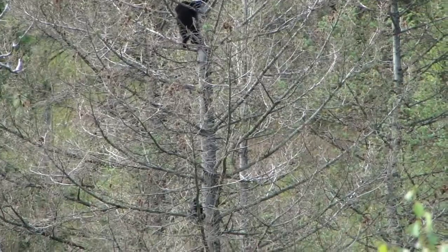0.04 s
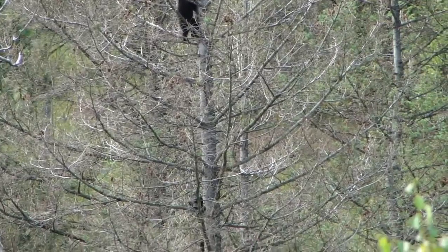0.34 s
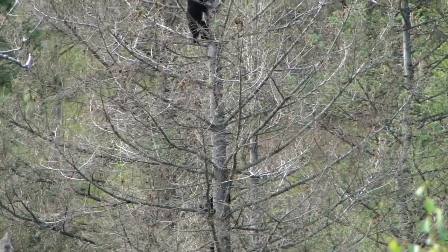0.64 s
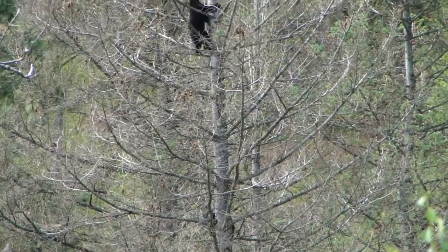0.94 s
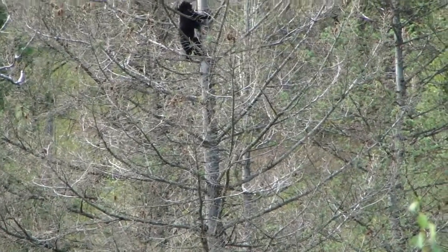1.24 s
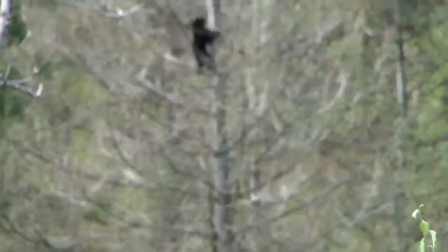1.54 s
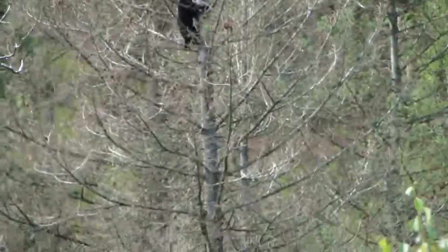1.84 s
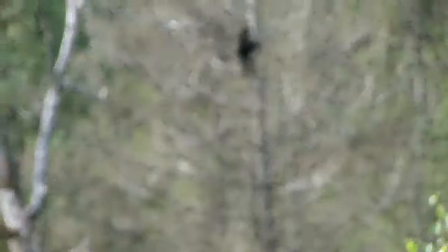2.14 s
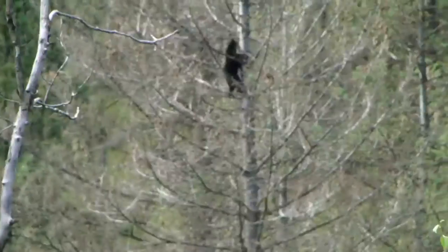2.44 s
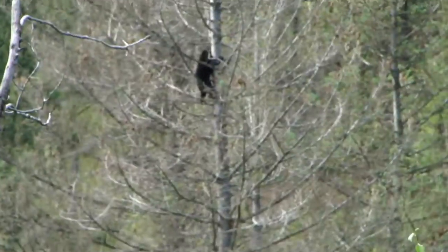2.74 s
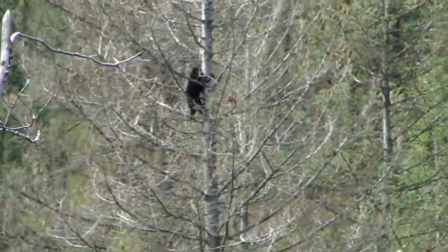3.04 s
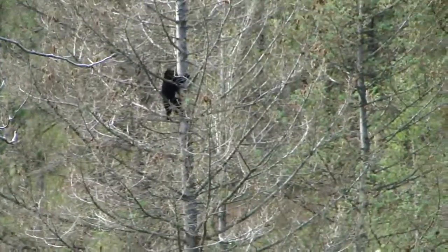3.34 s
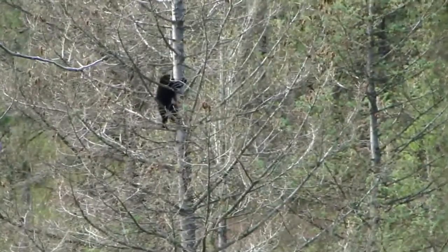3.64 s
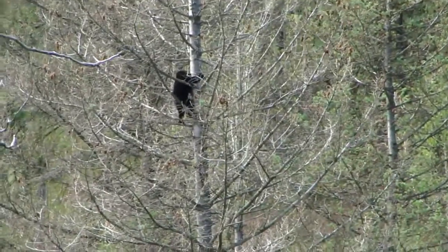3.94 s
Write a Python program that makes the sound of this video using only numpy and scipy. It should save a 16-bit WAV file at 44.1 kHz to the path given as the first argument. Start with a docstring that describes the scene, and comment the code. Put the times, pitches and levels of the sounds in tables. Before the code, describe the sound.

A distant roar, like tyres on a road, is loudest at first, swells slightly near 2 seconds and fades, with faint far knocks and a steady hiss of air and trees. From 1 to 2.5 seconds a camera's zoom lever clicks close by and its motor whirs in short runs, while fingers rub, bump and tick on the body. From about 3.5 seconds the focus motor hisses softly.

```python
"""Camera noises on a wooded hillside

A distant roar, most likely tyres on a road, swells once and fades, with faint knocks in it.
The air and the trees hiss steadily. Close by, the zoom lever of a hand-held camera clicks and
the gears of the lens motor whir in short runs; later the focus drive hisses.
Fingers rub, bump, tick and scrape on the camera body. Two microphones hear it, left and right."""
import sys
import numpy as np
from scipy import signal
from scipy.fft import rfft, irfft
from scipy.io import wavfile

SR = 44100
rng = np.random.default_rng(int(sys.argv[2]) if len(sys.argv) > 2 else 0)


def generate_wav(signal):
    """Clip the signal to [-1, 1] and save it as 16-bit WAV at the path in sys.argv[1]."""
    frames = np.transpose(np.atleast_2d(signal))
    scaled = np.clip(frames, -1, 1) * 32767
    pcm = np.round(scaled).astype(np.int16)
    wavfile.write(sys.argv[1], SR, pcm)


N = 176400
T = np.arange(N) / SR
HZ = np.maximum(np.arange(N // 2 + 1) * SR / N, 1)

# How the roar's low, middle and high parts rise and fall (time [s], relative level [dB])
ROAR_LOW_LEVEL = [(0, -27.5), (.4, -28), (.55, -30), (1.0, -32.5), (1.45, -34), (2.3, -38), (2.6, -37),
                  (3.3, -43.5), (4, -44.5)]
ROAR_MID_LEVEL = [(0.04, -25), (0.38, -24), (0.48, -29), (0.53, -26), (0.74, -30.5), (0.78, -26.5),
                  (1.4, -30.5), (1.6, -30), (1.91, -28), (2.55, -32), (3.0, -33.5), (3.2, -36.5),
                  (3.97, -38.5)]
ROAR_HIGH_LEVEL = [(0.04, -21), (.38, -24), (.5, -25), (1.0, -25.5), (1.39, -28), (1.51, -24.5),
                   (1.62, -25), (1.66, -21), (1.7, -29), (1.77, -25.5), (2.02, -21), (2.27, -25.5),
                   (2.31, -23.5), (2.42, -27), (2.55, -29.5), (3.0, -29), (3.15, -33.5), (3.48, -35),
                   (3.97, -33.5)]
# Brief surges of the middle and high parts (time [s], half-length [s], rise [dB])
ROAR_SURGES = [(2.026, 0.011, 3), (2.655, 0.04, 3), (3.275, 0.022, 1.5), (3.365, 0.019, 3),
               (3.738, 0.025, 3.5), (3.866, 0.03, 2.5), (3.955, 0.024, 3.5)]
# The roar's colour: how strong each pitch is (frequency [Hz], relative level [dB])
ROAR_COLOUR = [(30, -62.5), (100, -47), (195, -30.5), (245, -23.5), (300, -25.5), (400, -17), (460, -10.5),
               (530, -11), (565, -9.5), (600, -7.5), (635, -13), (735, -1.5), (790, -4.5), (845, -10.5),
               (905, -4), (970, -1.5), (1015, -6), (1110, -4), (1175, 3), (1250, 5), (1335, 4), (1420, -2),
               (1520, -3.5), (1630, -4), (1780, -11.5), (1950, -18.5), (2100, -19.5), (2230, -18),
               (2500, -29.5), (2700, -27), (3250, -33), (3500, -30), (5000, -52.5), (12000, -78.5)]
# Which side the roar leans to (frequency [Hz], left minus right [dB])
ROAR_BALANCE = [(100, 2), (250, 2), (380, 0.12), (480, 0.95), (540, 3), (615, 11.95), (740, 6.9),
                (845, 3.55), (950, 5.3), (1250, 7.96), (1550, 12), (1900, 9.8), (2300, 8.9), (2900, -1),
                (5000, 0)]
# How alike the roar is at the two microphones (frequency [Hz], likeness [0-1])
ROAR_ALIKE = [(100, 0.8), (300, 0.89), (450, 1), (640, 0.52), (900, 0.94), (1600, 0.94), (2100, 0.85),
              (3000, 0.34), (4200, .55), (5500, .1)]
# How far a wave is ahead at the left microphone (frequency [Hz], phase [radians])
LEFT_LEAD = [(100, 1), (370, -0.8), (470, 0.05), (590, 1), (720, 0.23), (900, 0), (1220, 0.76), (1800, 2),
             (2350, 3.5), (2600, -8.5), (2900, 2.5), (3800, 1.6), (5200, 3.5), (12000, 5)]
# Colour of the hiss of air and trees (frequency [Hz], relative level [dB])
AIR_COLOUR = [(30, -25), (100, -8.5), (230, -1.5), (450, 10), (1200, 1.5), (2100, 3), (2450, -2.5),
              (2750, 0.5), (3100, -5), (3500, -8), (3900, -13.5), (4300, -7.5), (5200, -18), (7000, -20.5),
              (11000, -28), (13000, -40.5)]
# Faint far knocks (time [s], level [dB])
FAR_KNOCKS = [(.289, -9.5), (.371, -13.5), (.830, -17.5), (1.458, -29), (1.658, -7), (2.033, -16),
              (2.297, -11), (2.309, -11.5), (2.348, -13), (2.447, -14), (2.616, -16), (3.582, -16)]
# Tones a knock rings with; wider ones die sooner (frequency [Hz], width [Hz], relative level [dB])
KNOCK_TONES = [(1000, 310, -11), (1280, 180, -5.5)]
# The hand shifts its grip (start [s], end [s], level [dB])
GRIP_SHIFTS = [(.98, 1.33, -51.5), (1.5, 1.7, -37.5), (1.83, 1.925, -38.5), (2.08, 2.5, -42.5)]
# Colour of that rubbing (frequency [Hz], relative level [dB])
GRIP_COLOUR = [(30, -7), (70, -6), (130, -3.5), (240, 4), (400, 17.5), (600, 7), (1500, -12), (5000, -49)]
# When the zoom motor and the focus drive run (start [s], end [s], relative level [dB])
ZOOM_TIMES = [(.99, 1.375, -42.5), (1.372, 1.525, -40), (1.605, 1.77, -40.5), (1.85, 2.165, -41.5),
              (2.245, 2.405, -40)]
FOCUS_TIMES = [(3.535, 4.1, -44.5)]
# Colours of the zoom's whir and the focus drive's hiss (frequency [Hz], relative level [dB])
ZOOM_COLOUR = [(100, -17.5), (250, 3.5), (420, -5), (700, 6.5), (2100, 1.5), (2600, -3.5), (3100, 4.5),
               (3800, -4.5), (4300, 3), (5100, -18), (5700, -8.5), (6450, -8), (6800, -12), (7250, -10.5),
               (8000, -20.5), (11200, -22.5), (13000, -41)]
FOCUS_COLOUR = [(100, -22), (400, 0.5), (1900, 5), (2250, -1), (2500, -4), (2800, 1.5), (3600, -9),
                (4250, -1), (5100, -21), (6200, -8.5), (7100, -15.5), (8300, -22.5), (13000, -35)]
# The zoom lever snaps in (time [s], relative level [dB], change to its three lowest tones [dB])
LEVER_SNAPS = [(.9915, -12.5, -2), (1.6095, -19, 5), (1.8447, -12, -3), (1.876, -23, -6), (2.2454, -11, -1)]
# The lever's plastic ring (frequency [Hz], width [Hz], relative level [dB])
LEVER_TONES = [(2280, 660, -7), (3170, 290, 3.5), (3740, 540, 1), (4105, 210, 3), (4530, 260, -1.5),
               (6670, 700, -11.5), (10500, 3500, -25.5)]
# The hand bumps the camera (time [s], level [dB], change to the two lowest tones [dB])
HAND_BUMPS = [(1.019, -28, 4), (1.038, -24, 0), (1.289, -29, -5), (1.62, -28, -2), (1.652, -26, 3),
              (2.284, -32, 3), (2.44, -32.5, -5), (3.45, -27.5, 5.5), (3.545, -32, 2)]
# Dull ring of the whole body (frequency [Hz], width [Hz], relative level [dB])
BUMP_TONES = [(138.5, 44, -8), (237, 43, -3), (426, 110, 7.5), (850, 220, 13)]
# Fingers tick and scrape (time [s], relative level [dB])
FINGER_TICKS = [(1.062, -29.5), (1.291, -27.5), (1.506, -33), (1.535, -29.5), (1.559, -32.5),
                (1.626, -26.5), (1.896, -31), (2.104, -28), (2.117, -26), (2.148, -37), (2.194, -32),
                (2.212, -34), (2.275, -26.5), (2.297, -29), (2.445, -30), (2.462, -29), (2.478, -32.5),
                (3.243, -34.5), (3.455, -34.5), (3.536, -36), (3.550, -36), (3.564, -34)]
# Ring of the camera's shell (frequency [Hz], width [Hz], relative level [dB])
TICK_TONES = [(910, 580, 16.5), (2140, 1830, 14.5), (3160, 350, 13), (4300, 870, -0.5), (6900, 1800, 1),
              (10500, 2500, -18)]
# Which side sound inside the camera leans to (frequency [Hz], left minus right [dB])
BODY_BALANCE = [(150, 6), (400, -14), (1000, 3.5), (2200, -3), (3000, -9), (4300, -15), (5200, -11),
                (6500, -2), (7300, -5), (9000, -6.5), (11000, 1), (12500, 16)]


def from_db(db):
    """Turn decibels into a number to multiply by."""
    return 10 ** (np.asarray(db) / 20)


def unit_power(x):
    """Scale a signal to an average power of 1."""
    return x / np.sqrt(np.mean(x ** 2) + 1e-20)


def across_hz(points):
    """Fill in a table for every frequency, on a scale of octaves."""
    hz, value = np.transpose(points)
    return np.interp(np.log(HZ), np.log(hz), value)


def drift(rate_hz):
    """A random wander of typical size 1; a higher rate wanders faster."""
    return unit_power(irfft(rfft(rng.standard_normal(N)) / (1 + (HZ / rate_hz) ** 2), N))


def pan(db):
    """Share the power between the two sides; positive is to the left."""
    gains = from_db(np.array([[.5], [-.5]]) * db)
    return gains / np.sqrt(np.mean(gains ** 2, axis=0))


def phase_shift():
    """Each frequency reaches one microphone a little ahead of the other."""
    return np.exp(.5j * across_hz(LEFT_LEAD) * np.array([[1], [-1]]))


def noise_spectrum(colour, likeness, pan_db):
    """The frequencies of a noise that the two microphones partly share."""
    shared, left, right = rfft(rng.standard_normal((3, N)))
    mixed = np.sqrt(likeness) * shared * phase_shift() + np.sqrt(1 - likeness) * np.array([left, right])
    return mixed * from_db(across_hz(colour)) * pan(pan_db)


def band_pass(x, band_hz):
    """Soften everything outside a range of frequencies."""
    return signal.sosfilt(signal.butter(2, band_hz, "band", fs=SR, output="sos"), x)


def gate(runs, ramp_s):
    """Fade in at the start of each run and out at its end."""
    return sum(from_db(db) * np.clip(np.minimum(T - start, end - T) / ramp_s, 0, 1)
               for start, end, db in runs)


def ring(force, tones):
    """A pushed object rings with several dying tones at once."""
    out = 0
    for k, (hz, width, db) in enumerate(tones):
        r = np.exp(-np.pi * width / SR)  # share of the swing left after one sample
        tone = signal.lfilter([1, 0, -1], [1, -2 * r * np.cos(2 * np.pi * hz / SR), r * r], force)
        out = out + (-1) ** k * from_db(db) * np.sqrt(1 - r * r) * tone
    return out


def change_lowest(tones, low_db, count):
    """The same tones, with the lowest few struck harder or more softly."""
    return [(hz, width, db + low_db * (k < count)) for k, (hz, width, db) in enumerate(tones)]


def strikes(rows, tones, bounce_s, bounce_db, band_hz):
    """Hard hits, each bouncing once, set an object ringing."""
    hits = np.zeros(N)
    for s, db in rows:
        hits[int(s * SR)] += from_db(db)
        hits[int((s + bounce_s * rng.uniform(.8, 1.2)) * SR)] += from_db(db + bounce_db)
    one_hit_peak = np.abs(ring(signal.unit_impulse(SR), tones)).max()
    ringing = band_pass(ring(hits + 1e-18, tones) / one_hit_peak, band_hz)
    return irfft(rfft(ringing) * phase_shift(), N)


def touches(rows, tones, rise_s, decay_s, tail_db, tail_s, pan_db, likeness, band_hz):
    """Each touch is a short burst of rubbing with a faint tail, ringing in the camera."""
    force = 0
    for s, db in rows:
        age = np.maximum(T - s, 0)
        burst = np.exp(-np.maximum(age - rise_s, 0) / decay_s)
        tail = from_db(tail_db) * np.exp(-age / tail_s)
        force = force + from_db(db) * np.minimum(age / rise_s, 1) * (burst + tail)
    shared = np.sqrt(likeness) * rng.standard_normal(N)
    grit = band_pass(shared + np.sqrt(1 - likeness) * rng.standard_normal((2, N)), band_hz)
    return pan(pan_db) * ring(force * grit + 1e-18, tones) / np.std(ring(grit, tones))


def roar():
    """Far tyre noise; moving air makes each band flutter and carries the upper ones over in surges."""
    noise = noise_spectrum(ROAR_COLOUR, across_hz(ROAR_ALIKE), across_hz(ROAR_BALANCE))
    split_hz, flutter_db = 807, 1.0
    edges_hz = split_hz * 2. ** np.array([-9, -2, -1, -.5, 0, .25, .5, .7, .9, 1.25, 9])
    bands = [irfft(noise * ((HZ >= low) & (HZ < high)), N) * from_db(flutter_db * drift(7.2))
             for low, high in zip(edges_hz, edges_hz[1:])]
    surge_db = sum(db * np.exp(-((T - s) / half_s) ** 2) for s, half_s, db in ROAR_SURGES)
    parts = [(bands[:4], ROAR_LOW_LEVEL, -0.5),
             (bands[4:6], ROAR_MID_LEVEL, 1.5 + surge_db),
             (bands[6:], ROAR_HIGH_LEVEL, surge_db)]
    return sum(unit_power(sum(group)) * from_db(extra_db + np.interp(T, *np.transpose(curve)))
               for group, curve, extra_db in parts)


def air():
    """Air and trees hiss evenly from all around."""
    return from_db(-42) * unit_power(irfft(noise_spectrum(AIR_COLOUR, likeness=0.3, pan_db=0.6), N))


def knocks():
    """Something far off to the left knocks and rings briefly."""
    return pan(9.1) * strikes(FAR_KNOCKS, KNOCK_TONES, bounce_s=.003, bounce_db=-4.5, band_hz=(500, 2000))


def grip():
    """Skin drags unevenly on the shell: a low rubbing."""
    rubbing = irfft(noise_spectrum(GRIP_COLOUR, likeness=0.45, pan_db=-4.0), N)
    lumps = from_db(3.5 * drift(25))
    return gate(GRIP_SHIFTS, ramp_s=0.013) * unit_power(rubbing * lumps)


def motor(runs, colour, pulse_depth, likeness, scratch_db, kick, kick_s):
    """Small zoom or focus gears kick in, then rub scratchily, pulsing with each uneven turn."""
    starting = sum((T > start) * np.exp(-np.abs(T - start) / kick_s) for start, end, db in runs)
    gear_hz = 57.5 * (1 + 0.0041 * drift(12.0))
    turns = np.cumsum(gear_hz) / SR
    friction = (1 + pulse_depth * np.sin(2 * np.pi * turns)) * from_db(scratch_db * drift(250))
    noise = irfft(noise_spectrum(colour, likeness, pan_db=0), N)
    return gate(runs, ramp_s=0.0031) * (1 + kick * starting) * unit_power(noise * friction)


def lever():
    """The plastic zoom lever snaps in, ringing a little differently each time, then rattles."""
    snaps = sum(strikes([(s, db)], change_lowest(LEVER_TONES, low_db, count=3),
                        bounce_s=.0022, bounce_db=-6.0, band_hz=(1200, 13000))
                for s, db, low_db in LEVER_SNAPS)
    rattle = touches([row[:2] for row in LEVER_SNAPS], LEVER_TONES, rise_s=0.002, decay_s=0.00083,
                     tail_db=-7.5, tail_s=0.021, pan_db=0.5, likeness=0.13, band_hz=(1500, 12900))
    return from_db(-1) * snaps + from_db(-12) * rattle


def bumps():
    """Soft blows of the hand; the fleshier ones thump deeper."""
    return sum(touches([(s, db)], change_lowest(BUMP_TONES, low_db, count=2), rise_s=0.007, decay_s=0.014,
                       tail_db=-30, tail_s=0.055, pan_db=3.5, likeness=0.44, band_hz=(30, 1410))
               for s, db, low_db in HAND_BUMPS)


def ticks():
    """Fingers tick and scrape, making the shell ring."""
    return touches(FINGER_TICKS, TICK_TONES, rise_s=0.00046, decay_s=0.0055,
                   tail_db=-32, tail_s=0.013, pan_db=-1, likeness=0.042, band_hz=(400, 13000))


def through_body(x):
    """Sound inside the camera reaches the two microphones unequally."""
    return irfft(rfft(x) * pan(across_hz(BODY_BALANCE) + 1.0), N)


def scene():
    """The outdoor sounds, with the camera's own noises on top."""
    outdoors = roar() + air() + knocks()
    zoom = motor(ZOOM_TIMES, ZOOM_COLOUR, pulse_depth=0.14, likeness=0.5,
                 scratch_db=2.0, kick=0.27, kick_s=.03)
    focus = motor(FOCUS_TIMES, FOCUS_COLOUR, pulse_depth=0.13, likeness=0.46,
                  scratch_db=1, kick=0.97, kick_s=0.071)
    return outdoors + grip() + bumps() + through_body(zoom + lever() + ticks() + focus)


def record(dry):
    """Cut the treble steeply above 12700 Hz."""
    return signal.sosfilt(signal.ellip(10, .2, 70, 12700, fs=SR, output="sos"), dry)


dry = scene()
out = record(dry)
generate_wav(out)
```